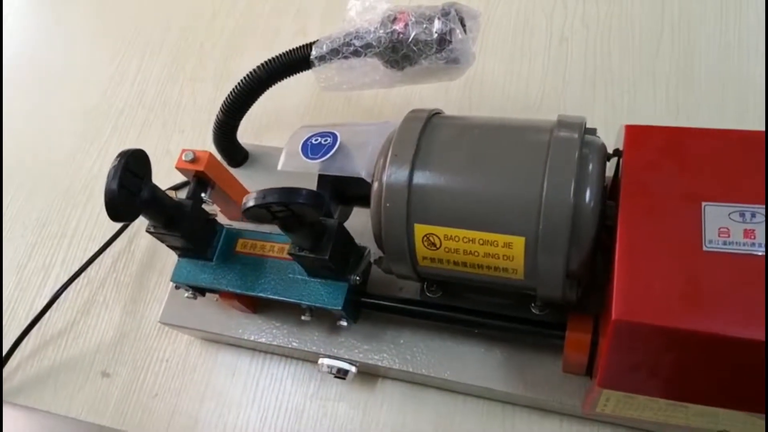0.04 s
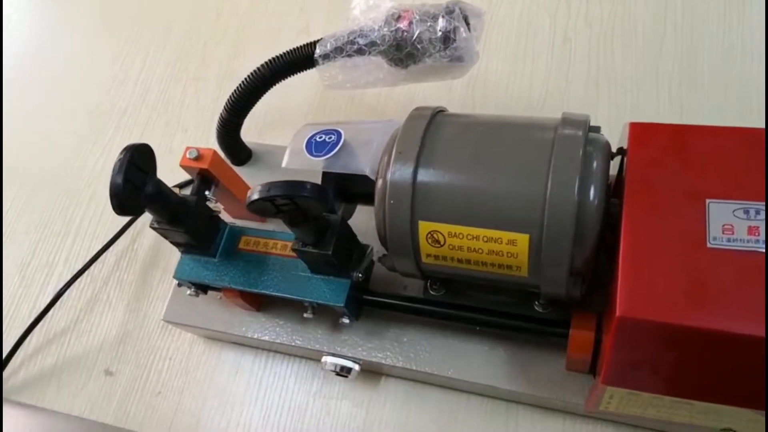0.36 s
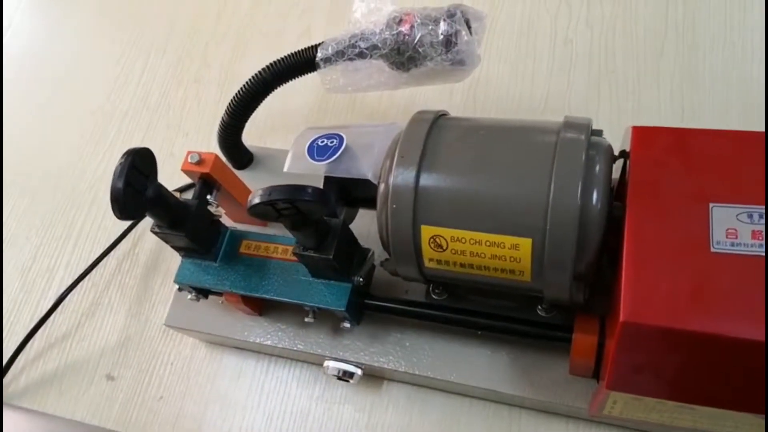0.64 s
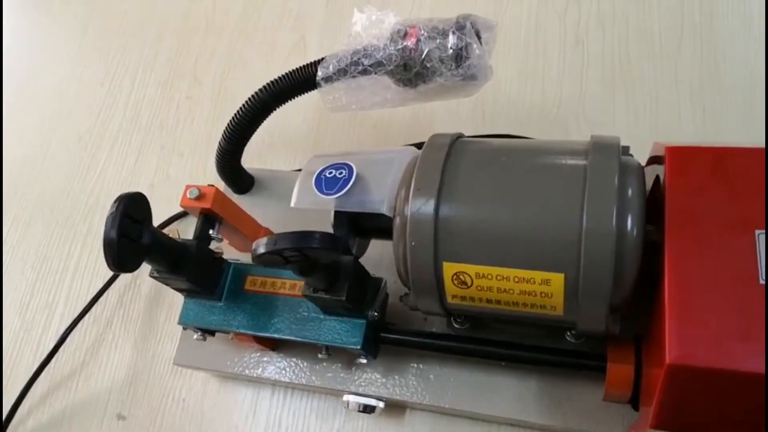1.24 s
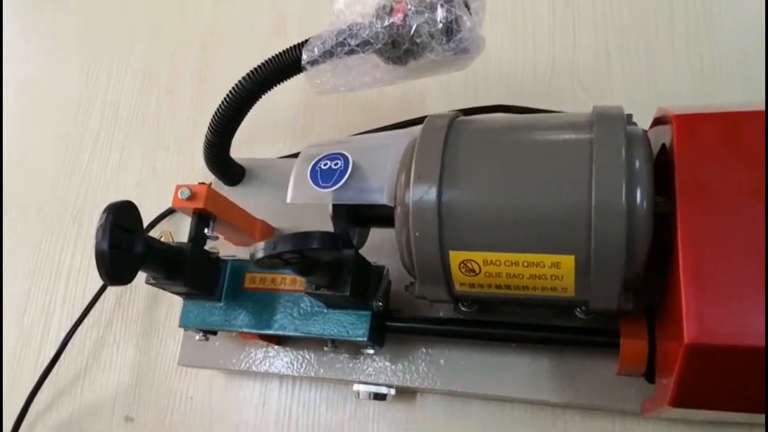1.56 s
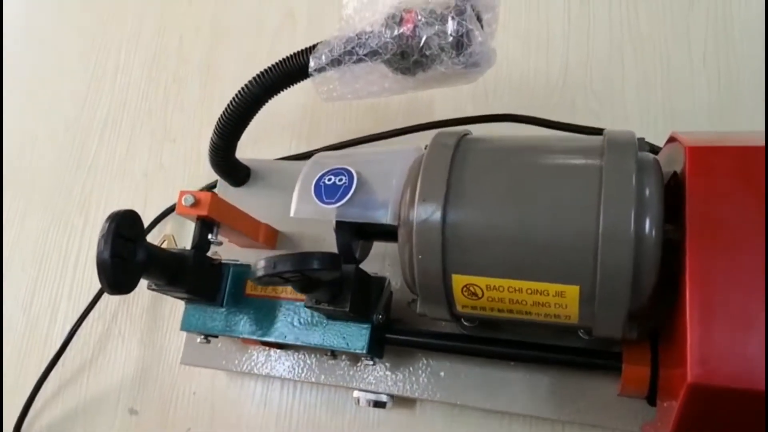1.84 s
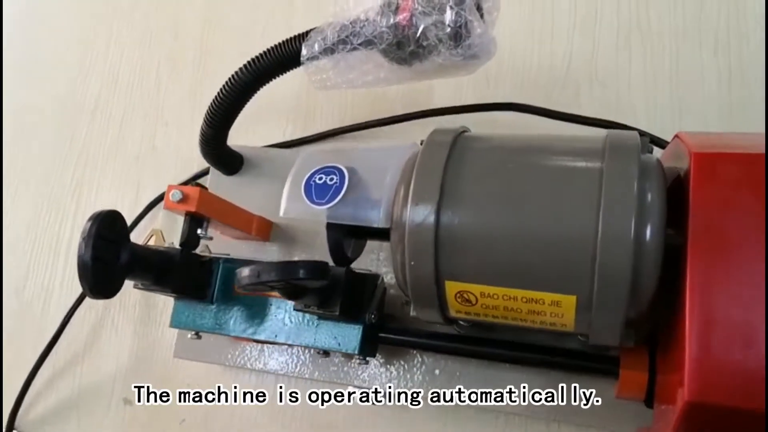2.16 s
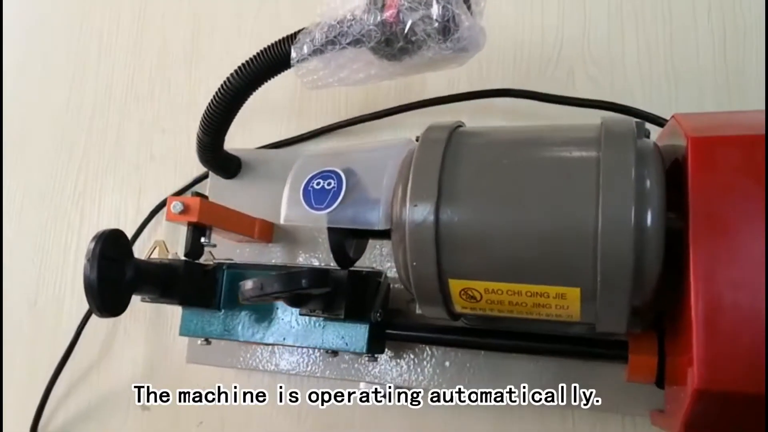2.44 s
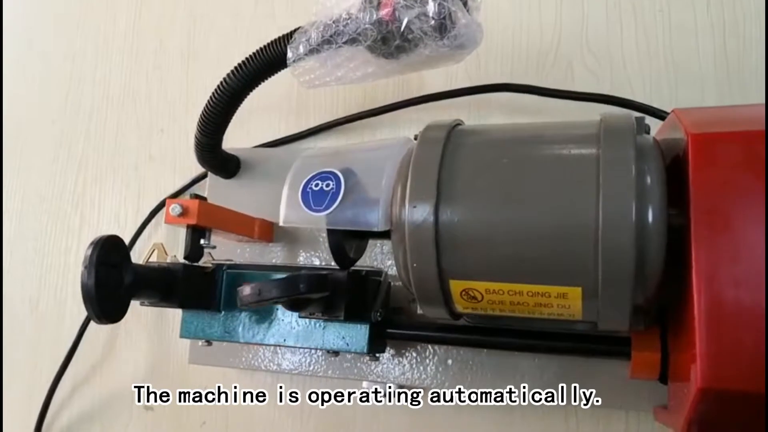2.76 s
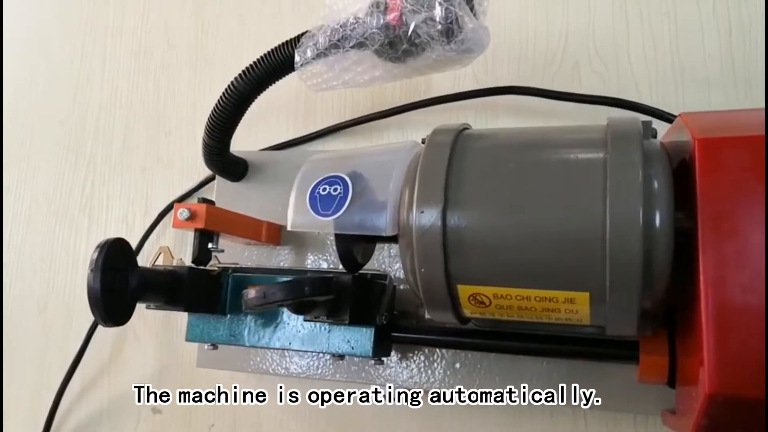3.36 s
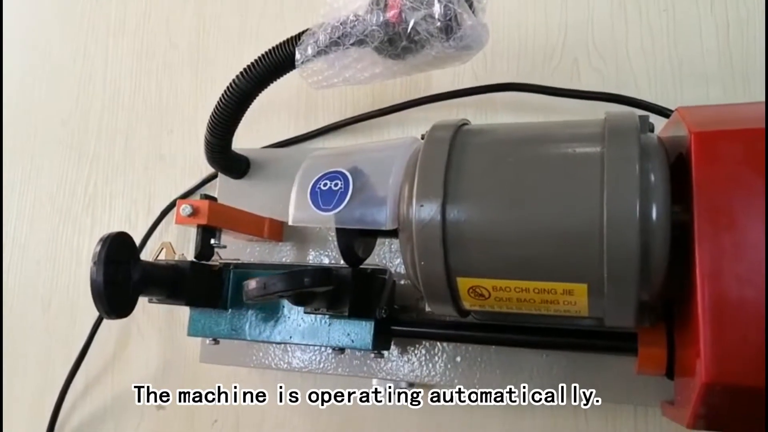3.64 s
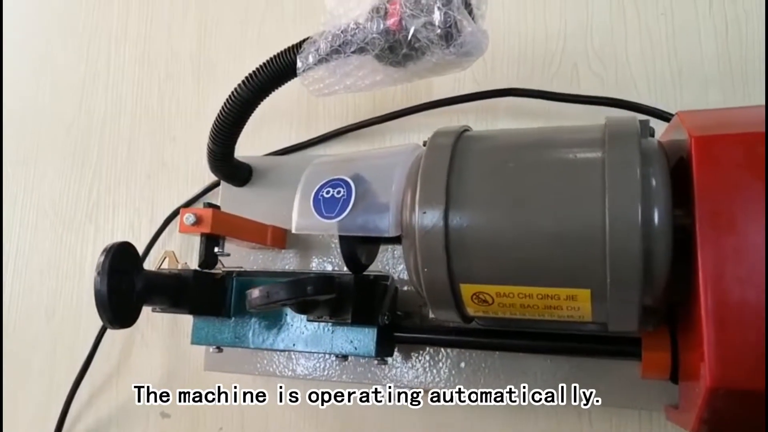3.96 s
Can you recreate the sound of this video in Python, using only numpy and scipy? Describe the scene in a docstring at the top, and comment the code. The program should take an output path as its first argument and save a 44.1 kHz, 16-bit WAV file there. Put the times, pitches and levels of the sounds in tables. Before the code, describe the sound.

Close up in a room, a key cutting machine runs without cutting: a steady low electric hum under a rasping belt whirr that rises and falls. Loose metal parts rattle lightly, and the whine changes tone midway.

```python
"""A low, steady hum under a swelling whirr: a key cutting machine idling on a table, indoors, close up.
The motor hums at twice the mains frequency; its shaft scrapes, whines and knocks once a turn.
The drive belt tightens and slackens on each lap, so the whirr swells, rises and falls.
Loose parts rattle and a bearing rings thinly. Near the middle the stereo microphone moves
over the machine, and the tones of the whine change their balance."""
import sys
import numpy as np
from scipy import signal
from scipy.fft import rfft, irfft, next_fast_len
from scipy.io import wavfile
from scipy.ndimage import map_coordinates

SR = 44100
rng = np.random.default_rng(int(sys.argv[2]) if len(sys.argv) > 2 else 0)


def digitize_waveform(pressure):
    """Quantize a signal to 16-bit integers and store it at the path in sys.argv[1].

    Rows of a 2-D input are taken as channels; values are limited to [-1, 1].
    """
    field = np.atleast_2d(pressure).T
    bounded = np.clip(field, -1, 1)
    quanta = np.round(bounded * 32767).astype(np.int16)
    wavfile.write(sys.argv[1], SR, quanta)


N = 176400

MAINS_HZ, SHAFT_HZ, SHAFT_ZERO_S = 49.98, 49.58, 2.893
BUMP_HZ, BUMP_WIDTH_HZ = 138.7, 34.5
RING_HZ, RING_WIDTH_HZ = 5950, 53
SWEEP_HALF_WIDTH_HZ, WHINE_WAVER_DB = 192, 2.5
MOVE_MIDDLE_S, MOVE_LENGTH_S, MIC_TOP_HZ = 1.76, 0.34, 10400

# Stereo balance at the microphone: f/Hz, left minus right/dB
MIC_BALANCE = [(100, 1.5), (450, -4.5), (900, -0.5), (1800, 2), (2150, 4.5), (2500, -8), (3300, -7),
               (5000, -5), (6000, -7.5), (7500, -4.5), (8500, -16), (10000, -20)]
# Likeness of the two channels: f/Hz, correlation
MIC_LIKENESS = [(60, 0.26), (150, 0.92), (330, 0.35), (570, 0.041), (9000, 0)]

# Colour of each source from close by: f/Hz, relative level/dB
RUMBLE_SPECTRUM = [(20, -7.5), (60, -9), (135, 0.5), (190, -4.5), (280, -10), (480, -11), (660, -25.5),
                   (1200, -15), (5000, -47.5)]
HISS_SPECTRUM = [(1500, -3), (4300, 3.5), (4800, -7), (6400, -4), (7200, 3), (8000, 3.5), (8700, -4.5),
                 (9500, -14.5), (10300, -36)]
RATTLE_SPECTRUM = [(700, -37.5), (1000, -17), (1150, 2), (1240, -5), (1340, 2), (1480, -2), (1800, 6),
                   (1920, -2.5), (2060, 3.5), (2200, -8.5), (2500, -8.5), (3200, -20.5), (4000, -7.5),
                   (5000, -19), (9000, -41)]
TICK_SPECTRUM = [(2000, -30.5), (3300, 3), (3650, -11), (4030, 7), (4600, -15), (6300, -11.5), (7900, -4.5),
                 (9000, -34.5), (11000, -65)]
KNOCK_SPECTRUM = [(300, -25), (480, 2.5), (680, -24.5), (1000, -22.5), (1250, -8.5), (1380, 12.5),
                  (1550, -20.5), (2200, -37), (3200, -26), (3700, -28), (8000, -61)]
CHATTER_SPECTRUM = [(2400, -34), (2900, -11.5), (3150, -0.5), (3300, 15.5), (3500, -12.5), (3800, -21.5),
                    (5000, -39)]
RASP_SPECTRUM = [(300, -36.5), (450, -12), (650, -26), (1150, -9.5), (1750, -3), (2250, -2.5), (2950, 4),
                 (3650, -9.5), (4300, -13.5), (5000, -18), (9000, -46)]
BUZZ_SPECTRUM = [(600, -23), (790, 1), (1000, -7), (1200, -1), (1700, 0), (2100, -8.5), (2600, -3.5),
                 (3400, -0.5), (4500, -34.5)]

# Rise and fall of each source: t/s, relative level/dB
HISS_LEVEL = [(0, -49), (3.2, -51.5), (4, -47.5)]
RING_LEVEL = [(0, -56.5), (.45, -51.5), (.55, -64.5), (.98, -45.5), (1.15, -62), (1.58, -49), (1.84, -58.5),
              (2.3, -47), (2.4, -57.5), (4, -57.5)]
TICK_LEVEL = [(0, -51), (1.19, -67), (1.61, -49.5), (1.87, -58), (2.09, -51), (3.17, -55), (3.44, -47),
              (3.85, -54), (4, -48)]
KNOCK_LEVEL = [(0, -51), (1.78, -59), (1.88, -45.5), (2.5, -46.5), (3.12, -46), (3.22, -52.5), (3.32, -47),
               (4, -46)]
HUM_LEVEL = [(0.0, -22), (0.03, -25), (0.75, -24), (1.18, -24.5), (1.76, -23.5), (3.98, -23), (4.0, -24)]
FOURTH_HARMONIC_LEVEL = [(0, 7), (.5, 3), (.65, -4.5), (1.7, -0.5), (1.9, 0), (3.1, -1), (3.3, -3),
                         (4, -0.5)]

# Brief sounds of casing, loose parts and belt: t/s, relative level/dB, width (sigma)/s
CASING_BUMPS = [(1.237, -42, 0.061), (3.252, -31, 0.023)]
PART_RATTLES = [(.235, -40.5, 0.036), (.385, -40, .025), (.87, -41.5, 0.013), (1.525, -45.5, 0.016),
                (1.675, -41.5, 0.028), (2.17, -39, 0.014), (2.8, -41.5, 0.032), (3.47, -40, .035)]
BELT_CHATTERS = [(1.12, -45, 0.03), (1.86, -37, 0.13), (2.38, -41.5, 0.07), (2.98, -39, 0.086),
                 (3.25, -36, .02), (3.74, -44, 0.057)]

# Belt tension, heard as the strength of its rasp: t/s, relative level/dB
BELT_TENSION = [(0, -41), (.58, -45.5), (.72, -39.5), (.88, -41), (1.02, -42.5), (1.24, -44.5),
                (1.34, -40.5), (1.6, -40.5), (1.9, -45.5), (2.02, -39.5), (2.18, -39.5), (2.28, -43),
                (2.53, -45), (2.67, -39.5), (2.82, -40.5), (2.88, -43), (3.16, -46.5), (3.3, -41),
                (3.48, -44), (3.8, -46), (3.96, -40)]
# Resonance of the scraping belt: t/s, f/Hz
BELT_RESONANCE = [(0, 2930), (.25, 2570), (.6, 3340), (.76, 2780), (.95, 2830), (1.22, 3400), (1.36, 2860),
                  (1.66, 2840), (1.78, 3180), (1.95, 3250), (2.04, 2780), (2.18, 2720), (2.4, 3100),
                  (2.55, 3370), (2.66, 2680), (2.82, 2710), (2.88, 3230), (3.22, 3330), (3.31, 2700),
                  (3.46, 2490), (3.8, 3400), (3.96, 2660)]
# Whine: shaft multiple, left level/dB, right level/dB, dB per dB of tension, change as the mic moves/dB
WHINE_ORDERS = [(18, -59, -66.5, -0.5, 2), (20, -60, -58, 0, -4.5), (23, -60, -54, -0.15, 0.5),
                (25, -53, -56.5, -0.5, -10.5), (33, -45.5, -55, 1.5, -18), (36, -51.5, -54, -1.3, -5),
                (42, -56.5, -49.5, 1.2, 2.5), (51, -54, -59, 3, 6), (55, -52, -49, 2.5, 4),
                (58, -42, -36.5, 0, -2.5), (60, -49, -44.5, 3.4, -10)]
# Stator tones: mains multiple, relative level/dB, left minus right/dB
HUM_HARMONICS = [(1, -26, 4), (2, 0, 0.5), (3, -29, 1.5), (4, -21.5, -3), (6, -27.5, 2), (8, -40, -15),
                 (10, -41.5, 10)]


def amp(db):
    """Decibels to gain."""
    return 10 ** (np.asarray(db) / 20)


def unit(x):
    """Scale to rms 1."""
    return x / np.sqrt(np.mean(x ** 2) + 1e-20)


def clock():
    """Time of each sample in seconds."""
    return np.arange(N) / SR


def along(points, hz):
    """Read (f/Hz, value) points on a log frequency axis."""
    f, v = np.transpose(points)
    return np.interp(np.log(hz + 1), np.log(f + 1), v)


def curve(rows):
    """Read (t/s, value) points at every sample."""
    return np.interp(clock(), *np.transpose(rows))


def swells(rows):
    """A bell-shaped swell of gain for each row."""
    return sum(amp(db) * np.exp(-.5 * ((clock() - s) / width) ** 2) for s, db, width in rows)


def wobble(rate):
    """A smooth random curve, rate knots a second."""
    return map_coordinates(rng.standard_normal(1024), [clock() * rate], mode="wrap")


def filtered(x, response):
    """Filter x by a gain given as a function of frequency."""
    size = next_fast_len(N + SR // 2)
    return irfft(rfft(x, size) * response(np.fft.rfftfreq(size, 1 / SR)), size)[..., :N]


def noise():
    """Two unrelated white noises."""
    return rng.standard_normal((2, N))


def resonance(x, hz, width_hz):
    """x through one resonance, at rms 1."""
    return unit(filtered(x, lambda f: 1j * f * width_hz / (hz * hz - f * f + 1j * f * width_hz)))


def at_mic(pair, spectrum):
    """Colour two signals and spread them in stereo at rms 1: bass more alike, treble to the right."""
    def mid_side_gains(f):
        angle = np.arccos(np.clip(along(MIC_LIKENESS, f), -1, 1)) / 2
        return amp(along(spectrum, f)) * [np.cos(angle), np.sin(angle)]

    mid, side = filtered(pair, mid_side_gains)
    stereo = np.array([mid + side, mid - side])
    return unit(filtered(stereo, lambda f: amp(np.outer([1, -1], along(MIC_BALANCE, f)) / 2)))


def scrape(turns, drift, rough):
    """The same surface passes every turn: a repeating pattern that slowly changes, plus fresh noise."""
    laps, size = 256, 2048
    start_phases = rng.uniform(0, 2 * np.pi, (2, 1, size // 8))
    phase_walk = np.cumsum(rng.standard_normal((2, laps, size // 8)), axis=1)
    surfaces = irfft(np.exp(1j * (start_phases + drift * phase_walk)), size).reshape(2, -1)
    place = (turns - np.floor(turns[0])) * size
    pattern = unit(np.array([np.interp(place, np.arange(laps * size), s) for s in surfaces]))
    return np.sqrt(1 - rough) * pattern + np.sqrt(2 * rough) * noise()


def each_turn(turns, attack_s, decay_s):
    """An envelope struck once a turn."""
    age = turns % 1 / SHAFT_HZ
    return (1 - np.exp(-age / attack_s)) * np.exp(-age / decay_s)


def tension_db():
    """How far the belt's tension lies above its mean."""
    tension = curve(BELT_TENSION)
    return tension - tension.mean()


def casing_rumble():
    """Casing and table rumble low behind everything, with a few dull bumps."""
    boom = resonance(noise()[0], BUMP_HZ, BUMP_WIDTH_HZ)
    boom = resonance(boom, BUMP_HZ, 2 * BUMP_WIDTH_HZ)
    rumble = amp(-45.5 + wobble(3.72)) * at_mic(noise(), RUMBLE_SPECTRUM)
    return rumble + swells(CASING_BUMPS) * boom


def bearing():
    """The balls hiss unevenly and ring the race."""
    hiss = at_mic(noise() * amp(1.9 * wobble(230)), HISS_SPECTRUM)
    rolling = noise()[0] * amp(2.4 * wobble(60)) + 1.2 * noise()
    ring = resonance(rolling, RING_HZ, RING_WIDTH_HZ)
    return amp(curve(HISS_LEVEL) + 5) * hiss + amp(curve(RING_LEVEL)) * ring


def loose_parts(turns):
    """Loose metal parts rattle in short bouts, shaken by the tightening belt."""
    pulse = 1 + .5 * unit(each_turn(turns + 0.16, attack_s=.001, decay_s=.005))
    shake = scrape(turns, drift=0.25, rough=0.17) * pulse
    return amp(3.5) * swells(PART_RATTLES) * at_mic(shake, RATTLE_SPECTRUM)


def shaft_knocks(turns):
    """Play in the shaft: every turn a sharp tick and a duller knock of the housing."""
    strike = each_turn(turns + 0.09, attack_s=0.00038, decay_s=0.0019)
    contact = scrape(turns, drift=0.21, rough=0.56) * strike * amp(2.3 * wobble(50))
    tick = at_mic(contact, TICK_SPECTRUM)
    impulses = np.diff(np.floor(turns), prepend=np.floor(turns[0]))
    blows = signal.hilbert(impulses * amp(2.2 * wobble(50)))
    knock = at_mic(np.array([blows.real, blows.imag]), KNOCK_SPECTRUM)  # left and right out of step
    return amp(curve(TICK_LEVEL) + 4.5) * tick + amp(curve(KNOCK_LEVEL) + 1.5) * knock


def belt_chatter(turns):
    """The slack belt chatters in bouts, one clack to a turn of the shaft."""
    clacks = scrape(turns, drift=0.21, rough=0.17) * each_turn(turns, attack_s=0.00086, decay_s=0.0043)
    return swells(BELT_CHATTERS) * at_mic(clacks, CHATTER_SPECTRUM)


def belt_sweep(turns):
    """Right of centre, the belt scrapes in a resonance that rises and falls on every lap."""
    pulse = 1 + 0.36 * unit(each_turn(turns, attack_s=0.00098, decay_s=0.0048))
    rub = scrape(turns, drift=0.26, rough=0.52) * pulse
    hz, times, frames = signal.stft(rub, SR, nperseg=1024)
    centre_hz = np.interp(times, *np.transpose(BELT_RESONANCE))
    gain = 1 / (1 + ((hz[:, None] - centre_hz) / SWEEP_HALF_WIDTH_HZ) ** 2)
    band = unit(signal.istft(frames * gain, nperseg=1024)[1][:, :N])
    return band * amp(np.array([[-44], [-38]]) + .5 * tension_db())


def belt_rasp(turns):
    """Belt and pulley rub harder as the belt tightens."""
    pulse = 1 + 0.27 * unit(each_turn(turns, attack_s=.001, decay_s=0.0077))
    rub = scrape(turns, drift=0.15, rough=0.44) * pulse
    return amp(curve(BELT_TENSION) + 4.5) * at_mic(rub, RASP_SPECTRUM)


def shaft_whine(turns):
    """Shaft tones over the housing's steady buzz; belt tension and microphone position set their mix."""
    mic_travel = np.clip((clock() - MOVE_MIDDLE_S) / MOVE_LENGTH_S + .5, 0, 1)
    out = amp(-50) * at_mic(scrape(turns, drift=0.05, rough=0.022), BUZZ_SPECTRUM)
    for order, left_db, right_db, follow, move_db in WHINE_ORDERS:
        level_db = np.array([[left_db], [right_db]]) + follow * tension_db() + move_db * mic_travel
        level_db += WHINE_WAVER_DB * wobble(9)
        phase = 2 * np.pi * (order * turns + rng.random())
        phase_waver = 0.29 * np.array([wobble(6), wobble(5)])
        out += amp(level_db) * np.sin(phase + phase_waver + np.array([[0], [1.2]]))  # right leads
    return out


def motor_hum():
    """The stator's magnetic hum: firm at twice the mains frequency, wavering in the other harmonics."""
    out = np.zeros((2, N))
    for order, db, pan_db in HUM_HARMONICS:
        level_db = db + 1.52 * wobble(2.6) * (order != 2)
        level_db += (order == 4) * curve(FOURTH_HARMONIC_LEVEL)
        tone = np.sin(2 * np.pi * (order * MAINS_HZ * clock() + rng.random()))
        out += amp(level_db + np.array([[pan_db], [-pan_db]]) / 2) * tone
    return np.sqrt(2) * amp(curve(HUM_LEVEL)) * out


def scene():
    """The machine from close by; whine, belt, knocks and rattles follow one slightly unsteady shaft."""
    turns = SHAFT_HZ * (clock() - SHAFT_ZERO_S) + 0.005 * wobble(2.986)
    motor = motor_hum() + shaft_whine(turns)
    belt = belt_rasp(turns) + belt_sweep(turns) + belt_chatter(turns)
    return motor + belt + shaft_knocks(turns) + loose_parts(turns) + bearing() + casing_rumble()


def record(dry):
    """The microphone passes nothing above its band limit."""
    return filtered(dry, lambda hz: hz < MIC_TOP_HZ)


dry = scene()
out = record(dry)
digitize_waveform(out)
```